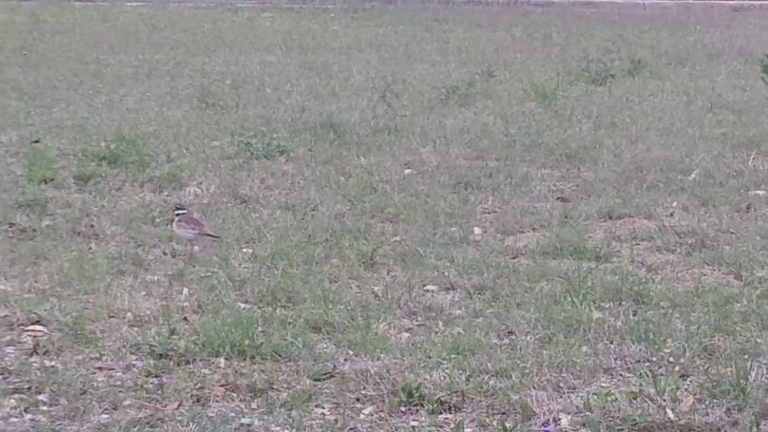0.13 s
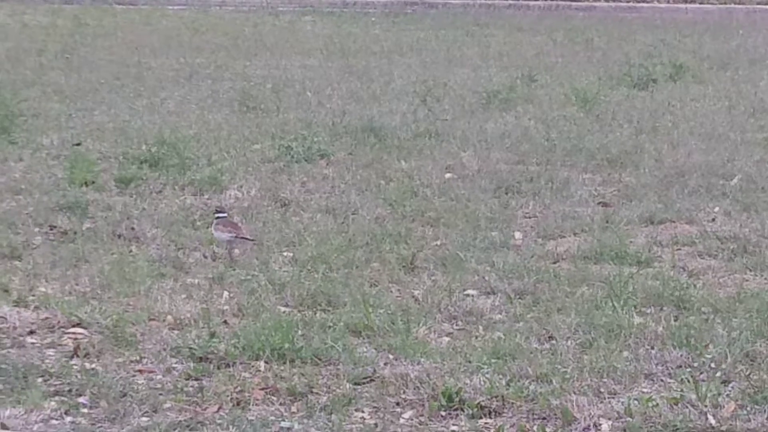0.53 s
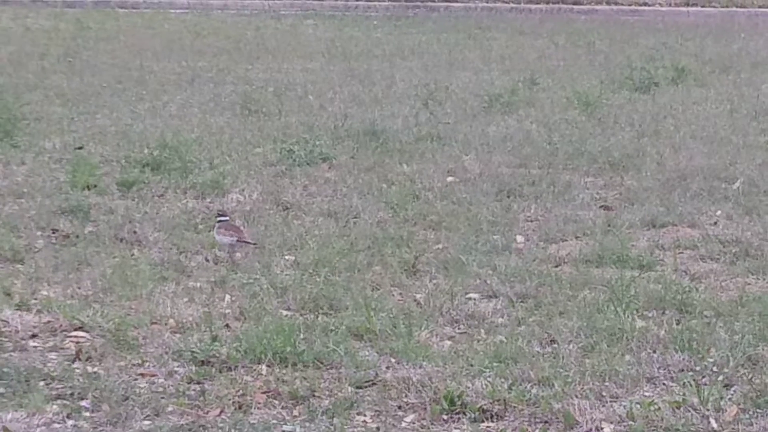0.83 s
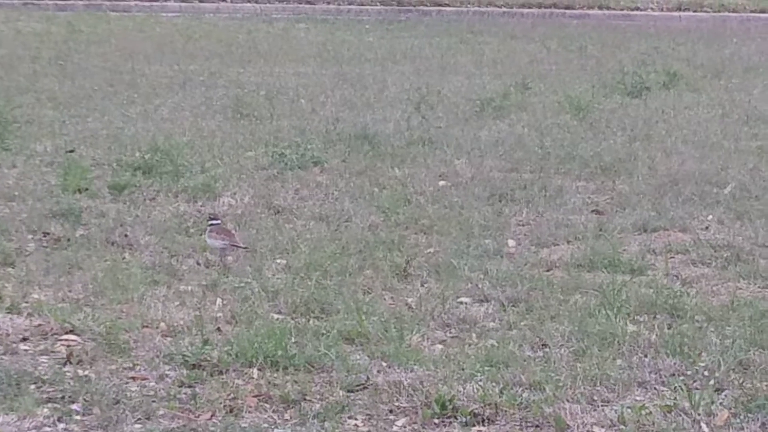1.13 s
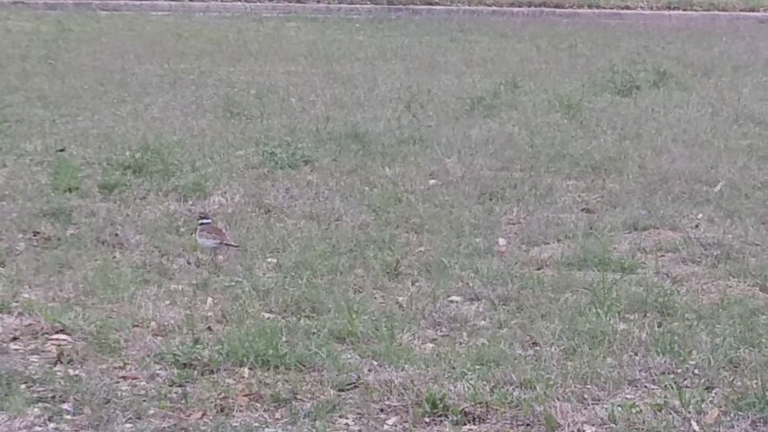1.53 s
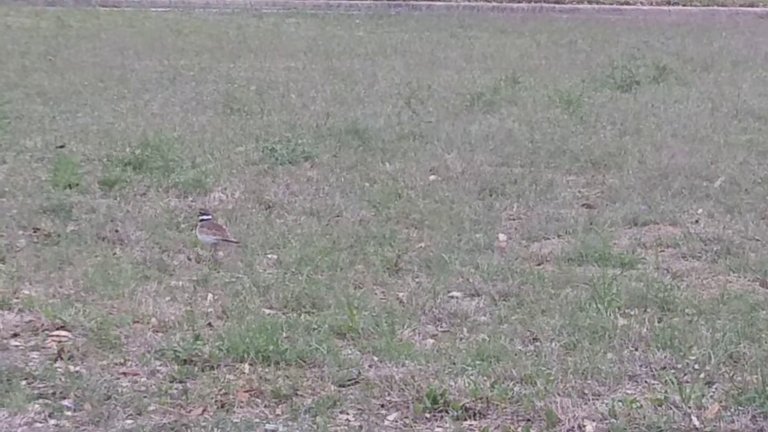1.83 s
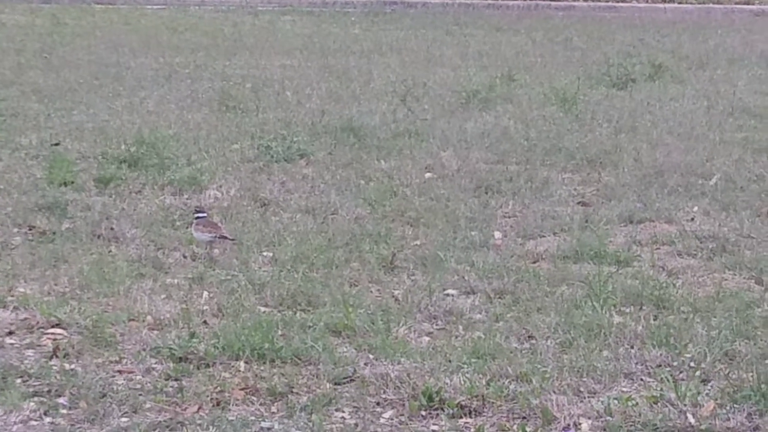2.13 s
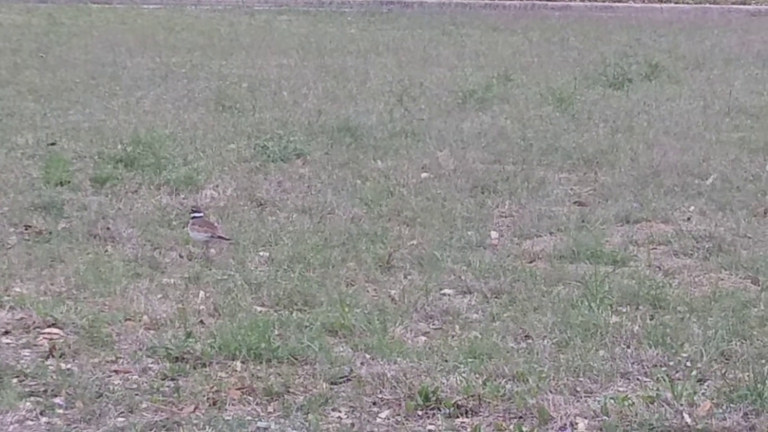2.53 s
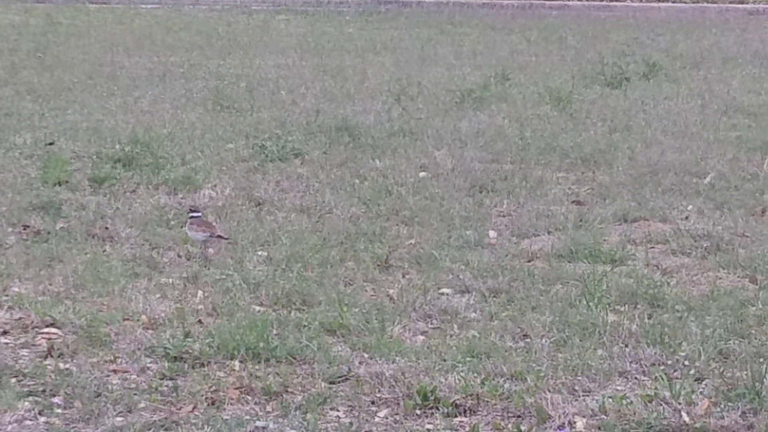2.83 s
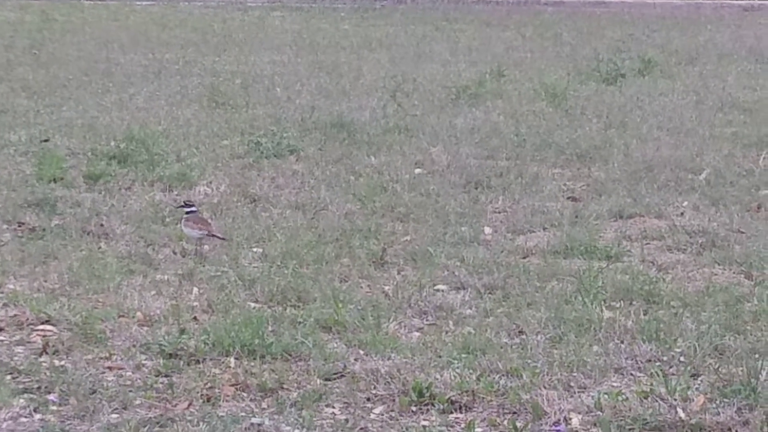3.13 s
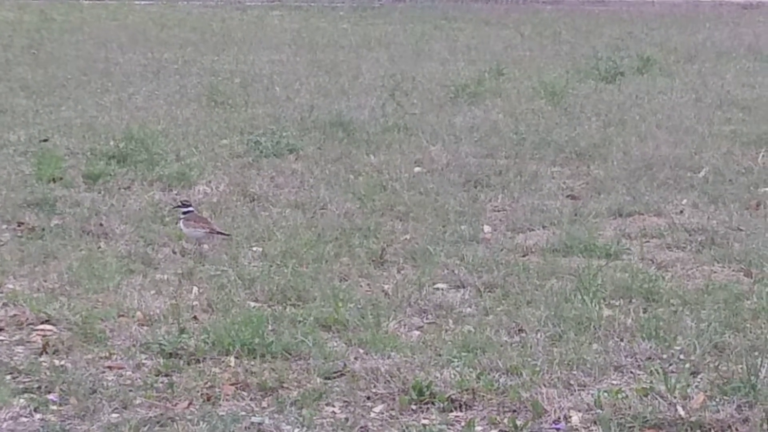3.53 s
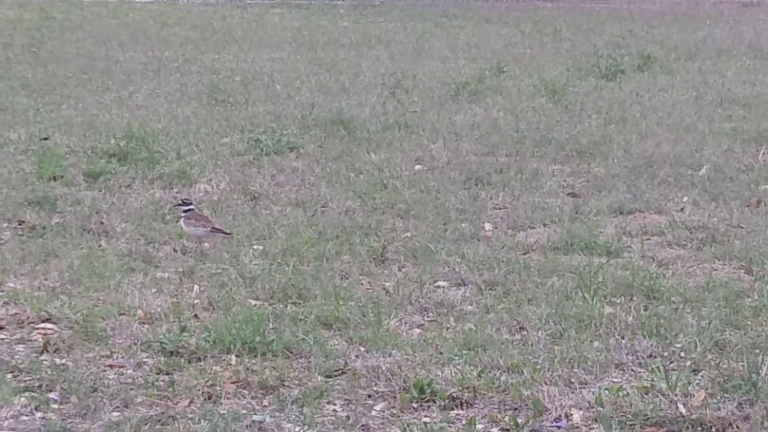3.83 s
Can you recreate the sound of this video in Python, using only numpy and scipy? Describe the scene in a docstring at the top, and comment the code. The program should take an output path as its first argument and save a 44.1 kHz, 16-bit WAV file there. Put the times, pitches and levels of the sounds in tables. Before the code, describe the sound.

Piercing shorebird calls come early, one harsh and two clean and sagging in pitch. Afterwards only faint far birds, tiny dry ticks and a soft engine-like hum remain, outdoors on open ground with little echo.

```python
"""A grass field. A bird close by ends a rasping cry that clears into a falling whistle; a plover gives
two short, clear, falling calls. Farther off, songbirds whistle, trill and chirp; dry ticks and a dull tap sound.
Under it lie a low distant rumble with an engine's hum, a thin whine and soft hiss.
Voices are sines on pitch curves; rasp, ticks, rumble and hiss are shaped noise; the tap is damped sines."""
import sys
import numpy as np
from scipy import signal
from scipy.fft import rfft, irfft
from scipy.io import wavfile

SR = 44100
rng = np.random.default_rng(int(sys.argv[2]) if len(sys.argv) > 2 else 0)


def int16_out(signal):
    """Quantize to a 16-bit WAV file."""
    q = np.round(np.clip(np.atleast_2d(signal).T, -1, 1) * 32767)
    wavfile.write(sys.argv[1], SR, q.astype(np.int16))


N = 176400
TIME = np.arange(N) / SR
CHIRP_JITTER = 0.0051   # pitch jitter of chirps and pips, share


def from_db(db):
    """Decibels to gain."""
    return 10 ** (np.asarray(db) / 20)


def rms_one(x):
    """Scale to unit power."""
    return x / np.sqrt(np.mean(x ** 2) + 1e-20)


def curves(rows, at=TIME):
    """Join table rows by straight lines over the first column; one curve per further column."""
    position, *columns = np.transpose(rows)
    return [np.interp(at, position, column) for column in columns]


def noise(gain_at):
    """Unit-power noise with a gain for every frequency."""
    hz = np.maximum(np.arange(N // 2 + 1) * SR / N, 1)
    spectrum = rfft(rng.standard_normal(N)) * gain_at(hz)
    return rms_one(irfft(spectrum, N))


def coloured(points):
    """Unit-power noise with a spectrum of (Hz, dB) points, joined on a log frequency axis."""
    f, db = np.transpose(points)
    return noise(lambda hz: from_db(np.interp(np.log(hz), np.log(f), db)))


def band_noise(centre_hz, octaves):
    """Unit-power noise in one soft-edged band."""
    return noise(lambda hz: 1 / (1 + (np.log2(hz / centre_hz) / octaves) ** 4))


def drift(rate_hz):
    """Random wander with spread 1, mostly slower than rate_hz."""
    return noise(lambda hz: 1 / (1 + (hz / rate_hz) ** 4))


def gate(start_s, end_s, attack_s=0.0027, release_s=0.0041):
    """Smooth opening and closing of a note."""
    opening = np.minimum((TIME - start_s) / attack_s, (end_s - TIME) / release_s)
    return np.sin(np.pi / 2 * np.clip(opening, 0, 1)) ** 2


def tone(hz):
    """Sine of unit power that follows a pitch curve."""
    return np.sqrt(2) * np.sin(2 * np.pi * np.cumsum(hz) / SR)


def scattered(x, t60_s):
    """Many tiny reflections that die away: convolution with a decaying noise tail of unit energy."""
    tail = rng.standard_normal(N) * from_db(-60 * TIME / t60_s)
    return signal.fftconvolve(x, tail / np.linalg.norm(tail))[:N]


def background():
    """Distant rumble and hiss as coloured noise, a wavering engine hum of harmonics and a thin whine."""
    # air spectrum: f/Hz, relative level per Hz/dB
    air_spectrum = [(25, -34), (40, -25.5), (52, -6), (100, -4), (160, -2.5), (260, 0.5), (400, -4),
                    (520, -5), (600, -8.5), (1050, -10.5), (1400, -14), (2200, -15.5), (3000, -22),
                    (4500, -19.5), (5600, -28.5), (6700, -29), (7600, -22.5), (8500, -15), (9500, -22),
                    (11000, -28.5), (13000, -31.5), (16000, -30.5)]
    # engine hum: multiple of the firing rate, mean level/dB
    hum_partials = [(2, -69.5), (3, -63.5), (4, -59), (6, -62.5), (7, -62.5), (9, -67.5), (10, -60)]
    air_db, firing_hz, hum_waver_db = -49, 27.17, 3
    whine_hz, whine_db, whine_jitter = 1165, -59.5, 0.002024

    firing = firing_hz * (1 + 0.0039 * drift(2))
    hum = sum(from_db(db + hum_waver_db * drift(3.2)) * tone(k * firing) for k, db in hum_partials)
    whine_gain = from_db(whine_db + 0.82 * drift(8))
    whine = whine_gain * tone(whine_hz * (1 + whine_jitter * drift(11)))
    return from_db(air_db) * coloured(air_spectrum) + hum + whine


def knock():
    """One small, dull tap: a few quickly damped modes in random phase."""
    # modes: f/Hz, peak level before envelope/dB
    modes = [(780, -31), (1750, -30.5), (2120, -29.5)]
    start_s, attack_s, t60_s = 2.123, 0.0018, 0.012

    age = np.maximum(TIME - start_s, 0)
    envelope = gate(start_s, N / SR, attack_s) * from_db(-60 * age / t60_s)
    return envelope * sum(from_db(db) * np.sin(2 * np.pi * (hz * age + rng.random())) for hz, db in modes)


def ticks():
    """Tiny dry snaps: band-noise bursts that decay exponentially."""
    # ticks: t at peak/s, level/dB, centre f/Hz, width/octaves, decay constant/s
    snaps = [(.522, -50, 7000, .9, .002), (1.26, -60, 6800, .25, .014), (1.595, -50, 11500, .2, .002),
             (1.838, -49, 14500, .2, .002), (3.046, -41, 12000, 0.85, 0.0018),
             (3.07, -43.5, 6900, 0.59, 0.0012), (3.137, -50.5, 12000, .25, .002),
             (3.226, -39.5, 12000, 0.82, .0016), (3.695, -48, 3010, 1.3, 0.0022)]
    out = np.zeros(N)
    for peak_s, db, centre_hz, octaves, decay_s in snaps:
        envelope = (TIME >= peak_s - decay_s / 2) * np.exp(-np.abs(TIME - peak_s) / decay_s)
        out += from_db(db) * band_noise(centre_hz, octaves) * envelope
    return out


def far_whistles():
    """Pure slurred whistles that flutter on the way; a reedier one cracks briefly to half pitch."""
    # phrases, one list each: t/s, f/Hz, level/dB
    phrases = [
        [(1.143, 3470, -56), (1.188, 3600, -64), (1.235, 3670, -55.5), (1.27, 3730, -55), (1.328, 3837, -46.5),
         (1.37, 3876, -57), (1.402, 3870, -61), (1.448, 3890, -54.5), (1.5, 3930, -58)],
        [(1.982, 3300, -60), (2.02, 3260, -66), (2.06, 3450, -60)],
        [(2.862, 5230, -56), (2.876, 4860, -46), (2.886, 4860, -56), (2.905, 4800, -66.5)],
        [(2.901, 3820, -55), (2.914, 3910, -42), (2.927, 4030, -51), (2.94, 4240, -41), (2.97, 4250, -50.5),
         (3.006, 4150, -44.5), (3.04, 4040, -55), (3.124, 3830, -61)],
        [(3.126, 3910, -53), (3.144, 4084, -48), (3.18, 4110, -54), (3.222, 4060, -62), (3.256, 4110, -61),
         (3.282, 4040, -57)],
    ]
    # reedier whistle: t/s, f/Hz, level/dB
    reedy_line = [(1.849, 4100, -41), (1.855, 3700, -43.5), (1.867, 3640, -48), (1.875, 3885, -44.5),
                  (1.922, 3907, -44), (1.937, 3810, -50)]
    # its overtones: multiple of pitch, level re fundamental/dB
    reedy_overtones = [(2, -19), (3, -24)]
    # crack: start/s, length/s
    crack_start_s, crack_length_s = (1.853, 0.019)
    # crack partials: multiple of half pitch, level/dB
    crack_overtones = [(1, -53.5), (3, -56.5), (5, -55.5), (7, -66)]
    jitter, shimmer_db = 0.0019, 0.5

    out = np.zeros(N)
    waver = 1 + jitter * drift(100)
    for phrase in phrases:
        hz, db = curves(phrase)
        out += tone(hz * waver) * from_db(db) * gate(phrase[0][0], phrase[-1][0])

    hz, db = curves(reedy_line)
    hz = hz * waver
    reedy = tone(hz) + sum(from_db(over_db) * tone(k * hz) for k, over_db in reedy_overtones)
    out += reedy * from_db(db) * gate(reedy_line[0][0], reedy_line[-1][0])

    crack = sum(from_db(over_db) * tone(k * hz / 2) for k, over_db in crack_overtones)
    out += crack * gate(crack_start_s, crack_start_s + crack_length_s)
    return out * from_db(shimmer_db * drift(50))


def far_trill():
    """A sinking whistle breaks into quick pulses, each rising in pitch, with a faint second voice above."""
    # trill: t/s, mean f/Hz, level before flutter/dB, pulse depth/0-1
    slide = [(.352, 3650, -63, 0.2), (.42, 3540, -61, .45), (.44, 3440, -57, 0.7), (0.515, 3350, -50, 0.9),
             (.55, 3270, -50.5, 0.9), (.57, 3110, -60, .9)]
    pulses_per_s, swing_hz, jitter, flutter_db = 70.2, 120, .016, 2.2
    upper_ratio, upper_db = 1.11, -11   # second voice at full depth

    hz, db, depth = curves(slide)
    beat = 2 * np.pi * pulses_per_s * (TIME - slide[0][0])
    pulses = 1 - depth * (1 - np.cos(beat)) / 2
    hz = hz * (1 + depth * jitter * drift(300)) + depth * swing_hz * np.sin(beat)
    voices = tone(hz) + depth * from_db(upper_db) * tone(upper_ratio * hz)
    level = from_db(db + flutter_db * drift(120))
    return voices * pulses * level * gate(slide[0][0], slide[-1][0])


def far_chirps():
    """Both sides of the syrinx draw an arch in pitch, loudest just after its top."""
    # chirps: t at top/s, top f/Hz, width/s, drop/share, level before flutter/dB,
    #         upper voice ratio, upper voice re lower/dB
    arches = [(.12, 3790, .018, 0.075, -53.5, 1.15, 1), (2.178, 3410, .02, 0.094, -61.5, 1.22, 1),
              (2.424, 4260, 0.019, 0.13, -50.5, 1.16, -7), (2.516, 4180, 0.021, 0.11, -60, 1.2, -1),
              (2.848, 5350, 0.017, 0.053, -57.5, 1.54, 3.5), (3.234, 3780, .024, 0.16, -55.5, 1.25, -9),
              (3.322, 3790, 0.02, 0.14, -58, 1.3, -9)]
    late, rise, fade = 0.23, 0.84, 1.5   # in arch widths
    flutter_db = 2.5

    out = np.zeros(N)
    low_waver = 1 + CHIRP_JITTER * drift(250)
    high_waver = 1 + CHIRP_JITTER * drift(250)
    for top_s, top_hz, width_s, drop, db, ratio, upper_db in arches:
        near = np.abs(TIME - top_s) < 5 * width_s
        u = (TIME[near] - top_s) / width_s
        hz = top_hz * (1 - drop * (1 - np.exp(-u ** 2)))
        voices = tone(hz * low_waver[near]) + from_db(upper_db) * tone(ratio * hz * high_waver[near])
        envelope = np.exp(-((u - late) / np.where(u < late, rise, fade)) ** 2)
        out[near] += voices * from_db(db) * envelope
    return out * from_db(flutter_db * drift(150))


def far_pips():
    """One voice scoops up to a sharp peak, growing louder, and breaks off on the way down."""
    # pips: t at peak/s, peak f/Hz, foot f/Hz, fall/s, length after peak/s, level at peak before flutter/dB
    peaks = [(1.990, 4900, 3420, .0085, 0.022, -48.5), (2.078, 4720, 3400, 0.012, 0.025, -59),
             (2.578, 4280, 3760, 0.01, 0.013, -57), (2.607, 4780, 3780, .015, 0.017, -44.5),
             (2.694, 4870, 3770, .015, .016, -53.5)]
    rise_s, lead_s, sharpness = .0065, .025, 1.7
    foot_db, flutter_db = -12, 3.5   # foot is relative to the peak

    out = np.zeros(N)
    waver = 1 + CHIRP_JITTER * drift(240)
    for peak_s, top_hz, foot_hz, fall_s, length_s, db in peaks:
        rising = TIME < peak_s
        height = np.exp(-(np.abs(TIME - peak_s) / np.where(rising, rise_s, fall_s)) ** sharpness)
        effort = np.where(rising, height, np.sqrt(height))
        hz = (foot_hz + (top_hz - foot_hz) * height) * waver
        level = from_db(db + foot_db * (1 - effort))
        out += tone(hz) * level * gate(peak_s - lead_s, peak_s + length_s)
    return out * from_db(flutter_db * drift(150))


def plover():
    """Each call starts abruptly and unsteadily, sags in pitch and lifts a little at the end."""
    # calls: start/s, length/s, pitch before snap and fall/Hz, fall/share of pitch, base level/dB
    calls = [(.196, 0.12, 4277, 0.049, -27), (1.008, 0.13, 4440, 0.082, -28)]
    # call shape: t/share of length, sag/share of fall, level re base/dB,
    #             octave re fundamental/dB, third harmonic re fundamental/dB
    call_contour = [(0, .1, -4.5, -12.5, -35), (.09, 0.026, 0.5, -12.5, -34), (.17, 0, -3, -16, -42),
                    (.26, .45, -5.5, -15.5, -55), (.5, 0.61, -5.5, -15.5, -55), (.82, 0.99, -7, -16.5, -55),
                    (.93, 0.67, -9, -16, -55), (1, 0.59, -14, -19, -55)]
    # half-pitch partials: multiple of pitch, greatest level re fundamental/dB
    split_partials = [(.5, -26.5), (1.5, -33.5)]
    attack_s, release_s, shimmer_db = 0.00081, 0.0046, 0.5
    jitter, onset_jitter, onset_s = 0.0013, 0.011, 0.016
    snap_share, snap_s = 0.06, 0.0006     # brief pitch excess at the onset
    split_at, split_span = 0.57, 0.45     # voice splits into half-pitch partials, shares of length

    out = np.zeros(N)
    for start_s, length_s, top_hz, fall, db in calls:
        age = TIME - start_s
        progress = age / length_s
        sag, shape_db, octave_db, third_db = curves(call_contour, progress)
        unsteady = jitter + onset_jitter * np.exp(-np.abs(age) / onset_s)
        snap = snap_share * np.exp(-np.abs(age) / snap_s)
        hz = top_hz * (1 + snap - fall * sag) * (1 + unsteady * drift(250))
        voice = tone(hz) + from_db(octave_db) * tone(2 * hz) + from_db(third_db) * tone(3 * hz)
        split = np.exp(-((progress - split_at) / split_span) ** 2)
        for multiple, partial_db in split_partials:
            voice += split * from_db(partial_db) * tone(multiple * hz)
        level = from_db(db + shape_db + shimmer_db * drift(120))
        out += voice * level * gate(start_s, start_s + length_s, attack_s, release_s)
    return out


def close_cry():
    """Uneven bursts of rasp and a torn squeal give way to a loud falling whistle; a dull hush trails it."""
    # clear tone: t/s, f before jitter/Hz, level/dB
    clear_line = [(0, 3500, -19), (.011, 3258, -22.5), (.015, 3810, -15.5), (.020, 3763, -19.5),
                  (.025, 3680, -9), (.030, 3630, -9.5), (.036, 3540, -14), (.042, 3390, -28),
                  (.058, 3494, -37.5)]
    # rasp: t/s, level before bursts/dB
    rasp_line = [(0, -14.5), (.008, -16.5), (.012, -17.5), (.018, -17.5), (.027, -20), (.034, -25.5),
                 (.044, -29.5), (.055, -35.5), (.068, -54), (.084, -62), (.12, -51), (.17, -65)]
    # throat colour of the rasp: f/Hz, relative level per Hz/dB
    throat = [(300, -29), (1000, -35), (1650, -25), (2200, -25), (2900, -23.5), (3300, -3.5), (3750, -0.5),
              (4400, -17.5), (5700, -12.5), (6800, -12.5), (7500, -2.5), (7950, 0.5), (8600, -4),
              (9350, -12), (9900, -25), (11500, -20), (13500, -33.5), (16000, -34.5)]
    octave_db, bursts_per_s, burst_depth = -30, 290, 0.4
    # torn upper voice: pitch over the mean clear tone, level over the rasp
    squeal_ratio, squeal_db, squeal_swing, squeal_jitter = 2.22, -3.5, .03, .022
    hush_hz, hush_octaves, hush_db = 1640, 0.42, -45
    hush_peak_s, hush_rise_s, hush_t60_s = .033, 0.013, 0.47

    hz, tone_db = curves(clear_line)
    rasp_db, = curves(rasp_line)
    hz = hz * (1 + 0.0066 * drift(500))
    clear_end_s = clear_line[-1][0]
    clear = from_db(tone_db) * (tone(hz) + from_db(octave_db) * tone(2 * hz))
    clear *= gate(0, clear_end_s, attack_s=0.000487)

    beat = tone(bursts_per_s * (1 + 0.22 * drift(150))) / np.sqrt(2)   # peaks at 1
    squeal_hz = squeal_ratio * np.mean(hz[TIME < clear_end_s])
    squeal = tone(squeal_hz * (1 + squeal_swing * beat + squeal_jitter * drift(700)))
    rasp = from_db(rasp_db) * (1 + burst_depth * beat) * (coloured(throat) + from_db(squeal_db) * squeal)

    hush_decay = from_db(hush_db - 60 * np.maximum(TIME - hush_peak_s, 0) / hush_t60_s)
    hush = gate(hush_peak_s - hush_rise_s, N / SR, hush_rise_s) * hush_decay
    cry = (clear + rasp) * gate(0, rasp_line[-1][0], attack_s=0.0003)
    return cry + hush * band_noise(hush_hz, hush_octaves)


def field(x):
    """Open ground returns a couple of faint echoes and a thin, dying scatter."""
    # echoes: delay/s, level/dB
    returns = [(.041, -37), (.105, -50)]
    scatter_db, scatter_t60_s = -37.5, 0.353
    # grass scatters mostly the treble
    high_pass = signal.butter(2, 6990, "high", fs=SR, output="sos")
    scatter = signal.sosfilt(high_pass, scattered(x, scatter_t60_s))
    echoes = sum(from_db(db) * np.interp(TIME - delay_s, TIME, x, left=0) for delay_s, db in returns)
    return from_db(scatter_db) * scatter + echoes


def scene():
    """The birds with faint echoes, the far ones blurred by distance, over the background."""
    blur_db, blur_t60_s = -16, .22
    far = far_whistles() + far_trill() + far_chirps() + far_pips()
    far_blur = from_db(blur_db) * scattered(far, blur_t60_s)
    birds = close_cry() + plover() + far + far_blur
    return (birds + field(birds) + ticks() + knock() + background())[None]


def record(dry):
    """The loudest peaks are rounded and the top is cut."""
    rounded = dry / (1 + (dry / .74) ** 8) ** (1 / 8)
    low_pass = signal.ellip(10, .1, 80, 15850, fs=SR, output="sos")
    return signal.sosfilt(low_pass, rounded)


dry = scene()
out = record(dry)
int16_out(out)
```